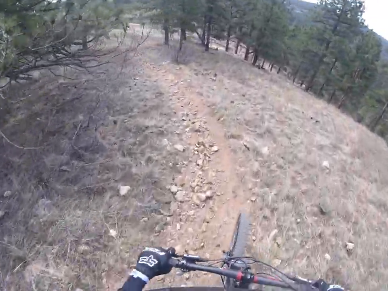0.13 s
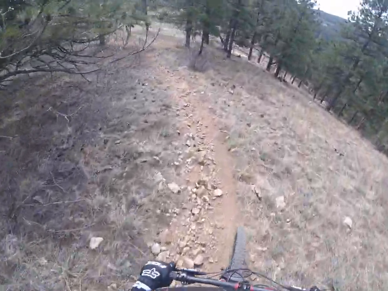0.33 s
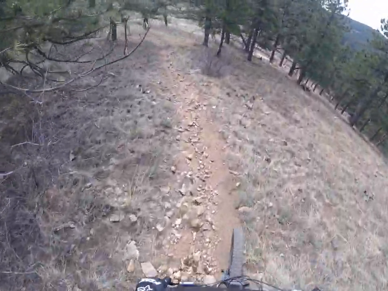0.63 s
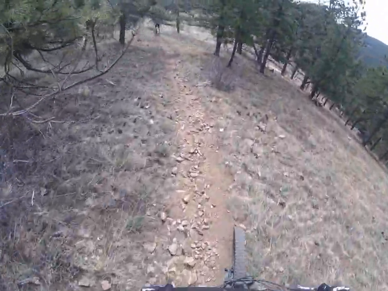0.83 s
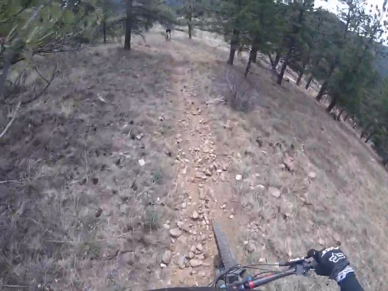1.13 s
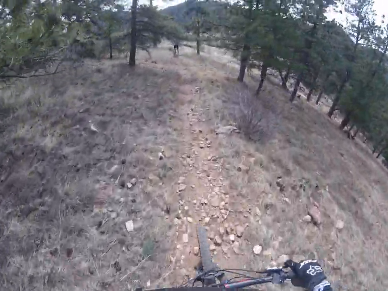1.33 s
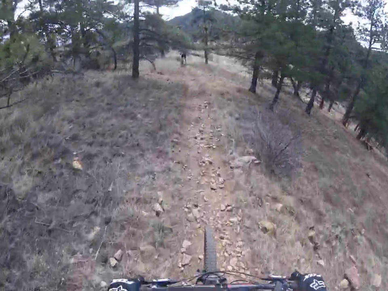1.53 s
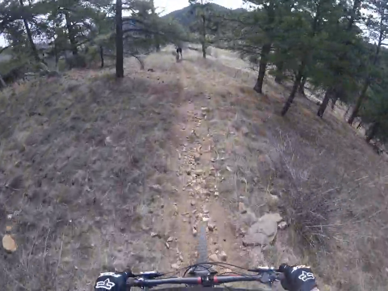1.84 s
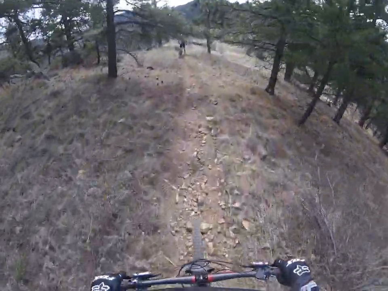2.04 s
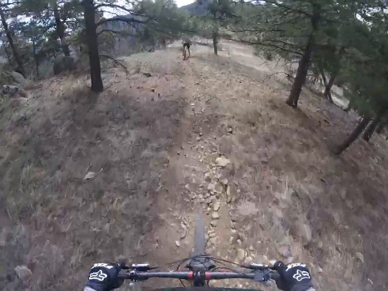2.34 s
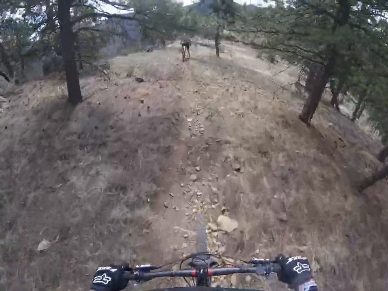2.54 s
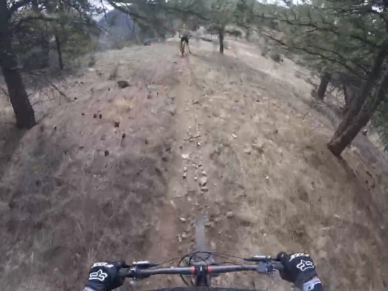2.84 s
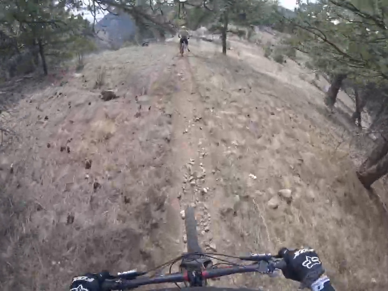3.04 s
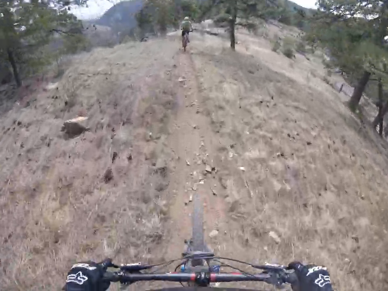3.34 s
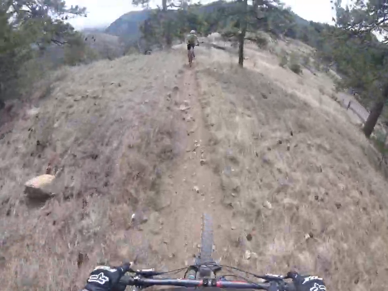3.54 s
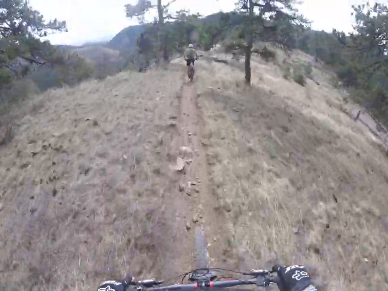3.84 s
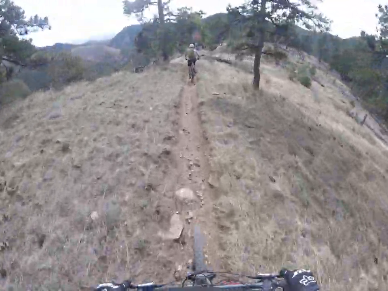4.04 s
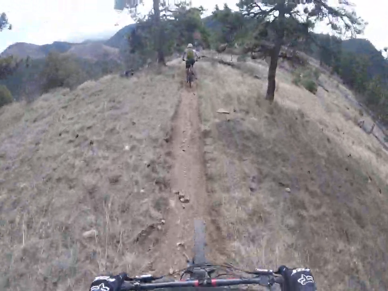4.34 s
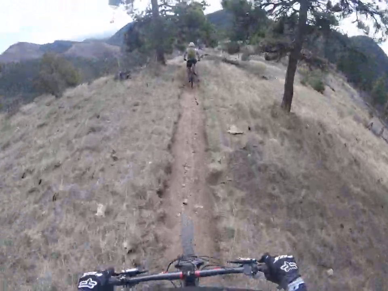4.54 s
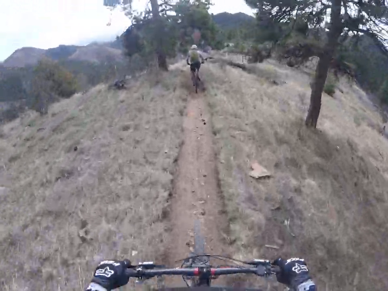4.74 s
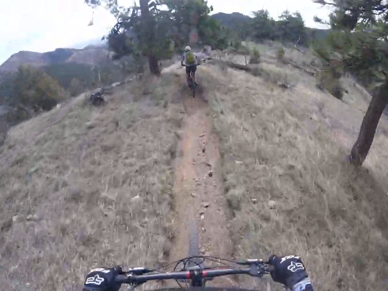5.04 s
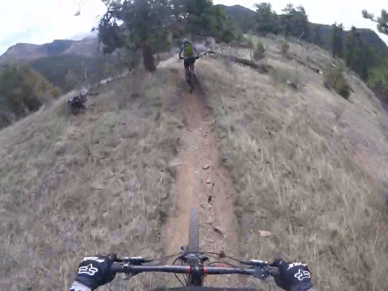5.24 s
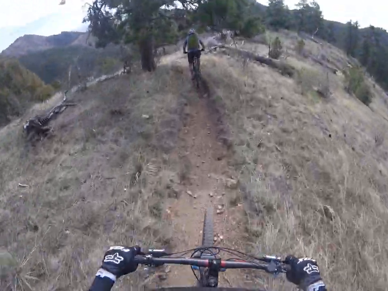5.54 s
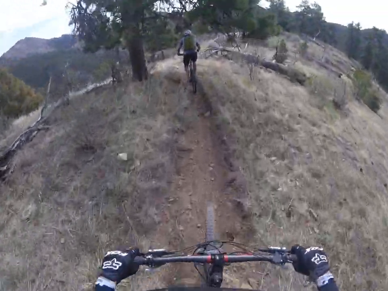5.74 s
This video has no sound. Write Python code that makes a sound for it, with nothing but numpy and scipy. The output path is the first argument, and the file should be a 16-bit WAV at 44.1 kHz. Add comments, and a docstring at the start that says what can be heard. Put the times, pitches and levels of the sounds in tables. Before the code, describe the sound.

A mountain bike travels down a stony dirt trail, heard close up through a small housed camera on the rider's head, in mono and without echo. It opens with a bright rattle and a burst of grit, then quieter crunching and a few knocks until about 1 s, with only a soft bump of wind. From 1 to 3 s stones click and knock in quick, irregular clusters, densest around 2 to 2.8 s, with dull wheel thuds and sharp chain or cable ticks, while low wind flutter swells. From 3 to 4 s the knocks thin slightly under gusty rumble. Another dense clatter comes at 4 to 4.5 s. Very heavy wind thumps strike near 4.4 and 5.0 s, followed by more slaps from 5.1 to 5.6 s. Tyre crunch and deep buffeting grow fuller to an abrupt end at about 5.9 s, over faint steady hiss.

```python
"""Buffeting wind thumps and flutters while a mountain bike crunches and clatters down a stony trail.
A small camera in a housing on the rider's head hears it: turbulence drives low resonances at its port.
Knobbly tyres crack grit as dense random grains; rocks, stones, chain and cables sound as single blows.
The housing cavity rings in the treble, over a soft hiss of passing air and the microphone's own noise."""
import sys
import numpy as np
from scipy import signal
from scipy.io import wavfile
from scipy.ndimage import uniform_filter1d

SR = 44100
rng = np.random.default_rng(int(sys.argv[2]) if len(sys.argv) > 2 else 0)


def int16_out(signal):
    """Quantize to a 16-bit WAV file."""
    q = np.round(np.clip(np.atleast_2d(signal).T, -1, 1) * 32767)
    wavfile.write(sys.argv[1], SR, q.astype(np.int16))


N = 260190  # length [samples]


def undb(db):
    """Decibels to gain."""
    return 10 ** (np.asarray(db) / 20)


def unit(x):
    """Scale to rms 1."""
    return x / np.sqrt(np.mean(x ** 2))


def curves(table):
    """Columns of a table joined by straight lines in time."""
    times, *columns = np.transpose(table)
    return [np.interp(np.arange(N) / SR, times, column) for column in columns]


def band(x, hz, width):
    """Resonance applied twice, so that its skirts are steep."""
    q = max(hz / (1.46 * width), .2)  # each pass is wider, so that the pair has the width asked for
    b, a = signal.iirpeak(min(hz, .45 * SR), q, SR)
    once = signal.lfilter(b, a, x)
    return signal.lfilter(b, a, once)


def walk(rate):
    """Random levels held 1 / rate s and slewed twice, scaled to rms 1."""
    hold = int(SR / rate)
    steps = np.repeat(rng.standard_normal(N // hold + 1), hold)
    slewed = uniform_filter1d(uniform_filter1d(steps, hold), hold)
    return unit(slewed[:N])


def grains(rate, spread_db):
    """Random clicks at an average rate per second; a larger spread makes their strengths less equal."""
    hit = rng.random(N) < rate / SR
    strength = undb(spread_db * np.minimum(rng.exponential(size=N), 3))
    return hit * rng.standard_normal(N) * strength


def resonate(modes, shared, own, flicker_db, rate):
    """Every mode is driven by the common excitation plus noise of its own and flickers alone."""
    total = np.zeros(N)
    for hz, width, db in modes:
        level = undb(db + flicker_db * walk(rate))
        drive = shared + own * rng.standard_normal(N)
        total += level * unit(band(drive, hz, width))
    return unit(total)


# wind strength: (time [s], deep buffeting level [dB], middle swirl level [dB], bright flutter level [dB])
WIND = [(0.0, -33, -36.5, -41), (0.36, -40.5, -72, -54.5), (0.49, -38.5, -50, -61),
        (0.67, -42.5, -52, -53.5), (0.77, -42.5, -57, -65), (0.83, -35, -49, -45.5),
        (0.95, -35.5, -45, -51.5), (1.08, -32, -39, -44), (1.22, -37.5, -50, -56.5),
        (1.35, -39, -38.5, -41.5), (1.41, -35, -59, -44), (1.51, -34.5, -32.5, -44), (1.54, -42, -46, -69),
        (1.58, -37, -50, -37), (1.64, -29, -26, -46), (1.68, -35, -36, -43.5), (1.89, -26.5, -34.5, -41),
        (1.94, -28.5, -50, -69), (1.99, -27.5, -38, -41), (2.09, -33, -44, -44), (2.2, -38, -36.5, -44),
        (2.27, -25, -40, -34.5), (2.35, -25.5, -31, -44), (2.41, -26.5, -40.5, -39.5),
        (2.46, -30, -29.5, -55), (2.58, -26, -40, -34.5), (2.63, -32.5, -35.5, -39.5),
        (2.74, -26.5, -31, -47.5), (2.92, -36.5, -38, -39), (3.22, -33, -25.5, -42.5),
        (3.25, -22, -37, -38.5), (3.32, -36.5, -35, -40.5), (3.66, -29.5, -38, -42),
        (4.16, -28.5, -31, -36.5), (4.26, -30.5, -35.5, -36), (4.44, -27.5, -27.5, -50),
        (4.49, -25.5, -40, -39.5), (4.62, -34, -29, -42), (4.96, -26, -34.5, -40.5), (4.98, -34, -35, -41),
        (5.03, -21.5, -27.5, -44), (5.09, -28, -29, -35.5), (5.62, -31, -29.5, -42.5),
        (5.67, -22, -33.5, -39), (5.8, -31.5, -24, -46), (5.88, -26, -26.5, -48), (5.9, -28, -27, -42)]
# single eddies that slap the port: (time [s], peak level [dB], width scale [ms])
EDDIES = [(0.029, -23.5, 11), (0.467, -28, 10), (1.066, -25, 4.7), (1.641, -17, 11), (2.473, -17, 4.4),
          (2.718, -21.5, 5.6), (2.807, -22.5, 6.9), (2.962, -19, 6.8), (3.059, -19.5, 4.3),
          (3.196, -18, 5.3), (3.225, -22, 1.1), (3.251, -16.5, 4.8), (3.482, -23, 3.2), (3.886, -23.5, 2.3),
          (4.023, -20, 3.7), (4.155, -23, 3.2), (4.432, -10.5, 2.6), (5.035, -9.5, 3.7),
          (5.316, -19.5, 3.1), (5.349, -13.5, 2), (5.508, -15, 2.4), (5.627, -25, 3.9), (5.783, -23, 3.3)]
# single eddies that pull at the port: (time [s], peak level [dB], width scale [ms])
PULLS = [(0.479, -40, 3.9), (0.842, -27.5, 9.2), (1.078, -25.5, 4.9), (1.629, -19, 4.7),
         (1.756, -17.5, 3.1), (1.832, -28, 1.9), (1.882, -15, 3.6), (1.961, -20, 5.2), (1.999, -18, 5.6),
         (2.25, -21, 3.7), (2.317, -17.5, 5.4), (2.345, -17.5, 5.1), (2.573, -18, 14), (3.128, -19, 3.7),
         (3.368, -20, 5.5), (3.784, -15.5, 3.3), (4.136, -17.5, 5), (4.603, -22, 5.8), (4.735, -19, 3),
         (5.005, -20, 7.3), (5.154, -13.5, 3.9), (5.216, -16, 3.7), (5.305, -14.5, 3.6), (5.493, -16, 3.6),
         (5.534, -18, 3.3), (5.868, -13, 3.4)]
# wind resonances at the port, deep, middle and bright: (centre [Hz], width [Hz], relative level [dB])
BUFFET = [(24.2, 13.6, 5), (35.3, 14, 3), (56.1, 21.2, 3)]
SURGE = [(74.4, 43.5, 3.5), (114.5, 29, -3.5), (143.6, 42, -7)]
FLUTTER = [(190.5, 75, 3.5), (221, 82, 1), (329, 198, 0), (477, 760, -14.5)]


def wind():
    """Turbulence in a deep, a middle and a bright part, plus lone pressure slaps and pulls."""
    deep_db, middle_db, bright_db = curves(WIND)
    swirl = unit(grains(150, spread_db=2.5))
    throb = unit(undb(0.76 * walk(25.11)))
    gusts = unit(undb(0.2 * walk(7.11)))
    deep = resonate(BUFFET, swirl, own=0.81, flicker_db=1.0, rate=4.72)
    middle = resonate(SURGE, swirl, own=1.0, flicker_db=0.46, rate=20)
    bright = resonate(FLUTTER, swirl, own=1.33, flicker_db=0.56, rate=7.5)
    out = gusts * undb(deep_db) * deep
    out += throb * gusts ** 0.76 * (undb(middle_db) * middle + undb(bright_db) * bright)
    t = np.arange(N) / SR
    for sign, eddies in [(1, EDDIES), (-1, PULLS)]:
        for s, db, ms in eddies:
            near = slice(max(int((s - .05) * SR), 0), int((s + .05) * SR))
            u = (t[near] - s) * 1000 / ms
            # a pressure bump less a slightly wider, shallower one
            push = np.exp(-(u / 0.74) ** 2) - 0.28 * np.exp(-(u / 0.8) ** 2)
            swept = out[near] * (1 - 0.9 * np.exp(-u ** 2))  # it sweeps the other swirls away
            out[near] = swept + sign * undb(db) * push / push.max()
    return out


# tyre crunch: (time [s], level [dB], upper part against the lower [dB], before a fixed 4.5 dB cut)
ROLL = [(0.0, -38, 0), (0.08, -46, 2.5), (0.23, -48.5, 1.5), (0.61, -53.5, 3), (0.87, -52.5, 1.5),
        (1.02, -49, 2.5), (1.59, -48.5, -0.5), (2.05, -49.5, 2.5), (2.2, -50, -0.5), (2.61, -47, 0.5),
        (2.73, -46, 0.5), (3.75, -46.5, -1), (4.19, -46.5, 0), (4.62, -46, -2.5), (5.04, -43.5, -2.5),
        (5.42, -46.5, 0), (5.67, -43.5, -1), (5.9, -41.5, 0.5)]
# fine grit under the knobs: (time [s], level [dB])
GRIT = [(0.0, -37), (0.03, -47.5), (0.1, -44), (0.45, -55), (1.0, -53.5), (1.5, -52.5), (2.19, -49),
        (2.75, -48), (3.45, -48), (3.73, -53.5), (4.1, -48), (4.57, -51), (5.06, -48), (5.45, -50.5),
        (5.6, -47), (5.9, -46.5)]
# patches of loose stones: (time [s], crunch swell [dB], grit swell [dB], length [ms])
LOOSE = [(0.192, 5.5, 0.5, 88), (0.431, 4.5, 4.5, 36), (0.554, 7, 3.5, 20), (0.806, 10, 5, 29),
         (0.85, 4, 0.5, 38), (1.087, 0.5, 4, 150), (1.325, 4, 8, 12), (1.354, 6, 10, 32), (1.382, 6, 0, 13),
         (1.431, 7.5, -2, 19), (1.596, 6.5, 9, 39), (1.686, 6.5, 0, 57), (1.871, 10, 2, 25),
         (1.971, 2, 15, 12), (2.14, 7, 9.5, 27), (2.269, 6, 3, 170), (2.335, 4, 8, 35), (2.409, 9.5, 4, 13),
         (2.482, 12, 10, 7.4), (2.64, 9.5, 6.5, 40), (2.75, 4, 10.5, 32), (2.898, 5, 10, 8.1),
         (3.183, 4.5, 2, 23), (3.222, 5.5, 4, 27), (3.605, -0.5, 8, 39), (3.717, 5, 8, 14),
         (3.787, 4.5, 5.5, 41), (3.84, 8, -13, 5.6), (3.963, 4.5, 5.5, 31), (4.301, 6, 3, 22),
         (4.349, 9.5, 10, 14), (4.529, 6.5, 3, 47), (4.581, 5.5, 3, 76), (4.7, 3.5, 1, 40),
         (4.828, 4.5, 9.5, 20), (4.998, 6, -4, 17), (5.628, 10, 10.5, 9.4), (5.833, 8, 1, 16)]
# tyre crunch colour, three lower bands then two upper: (centre [Hz], width [Hz], relative level [dB])
CRUNCH = [(484, 465, 4), (860, 700, 1.5), (1406, 900, 6), (2580, 1920, 3.5), (2770, 670, -6.5)]
# housing cavity modes: (centre [Hz], width [Hz], relative level [dB])
CAVITY = [(4940, 840, 11), (5470, 550, 6.5), (6420, 290, 6), (6060, 2000, 3.5), (9020, 300, -6),
          (11400, 730, -16)]


def tyres():
    """Grit cracks under the knobs; coarse grains crunch, fine ones ring the cavity, loose patches swell both."""
    patchy_db = 0.4 * walk(16)
    roll_db, upper_db = curves(ROLL)
    coarse_db = roll_db + patchy_db
    fine_db = curves(GRIT)[0] + patchy_db
    t = np.arange(N) / SR
    for s, crunch_db, grit_db, ms in LOOSE:
        swell = np.exp(-((t - s) * 2000 / ms) ** 2)
        coarse_db = coarse_db + crunch_db * swell
        fine_db = fine_db + grit_db * swell
    unrest = unit(undb(0.49 * walk(60)))
    grit = unit(grains(1200, spread_db=2.5))
    lower = resonate(CRUNCH[:3], grit, own=1.0, flicker_db=3.0, rate=45)
    upper = resonate(CRUNCH[3:], grit, own=1.0, flicker_db=3.0, rate=45)
    coarse = lower + undb(upper_db - 4.5) * upper
    # pebbles tick against each other, sparse enough to stand apart
    for hz in (750., 1200., 1900.):
        coarse += undb(-14) * unit(band(grains(90, spread_db=0.0), hz, hz / 2))
    fine_grit = unit(grains(2500, spread_db=-1.0)) + 0.067 * grit
    fine = resonate(CAVITY, fine_grit, own=1.0, flicker_db=2.5, rate=42)
    return unrest * (undb(coarse_db) * coarse + undb(fine_db) * fine)


def add(out, s, piece):
    """Mix a piece in at a time in seconds."""
    i = int(s * SR)
    out[i:i + len(piece)] += piece[:N - i]


def blows(table, body, sharpness, body_db, crack_db):
    """Each blow is a hard crack and a dying noise cluster, coloured by its own centre and the body it shakes."""
    contact_cycles = 0.23  # length of the contact, in periods of the blow's centre
    out, t = np.zeros(N), np.arange(int(.1 * SR)) / SR
    for s, db, hz, ms in table:
        t60 = max(ms, 5)  # [ms]
        noise, lumps = rng.standard_normal((2, len(t)))
        burst = noise * undb(18.4 * uniform_filter1d(lumps, size=40))
        burst *= undb(-60 * t * 1000 / t60) * np.minimum(t / 0.0011, 1)
        burst[0] = undb(crack_db) * 30 / t60  # the shorter the blow, the stronger its crack
        burst = uniform_filter1d(burst, max(int(contact_cycles * SR / hz), 1))  # low blows touch longer
        ring = unit(sum(undb(g) * band(burst, f, w) / np.sqrt(w) for f, w, g in body))
        piece = unit(band(burst, hz, hz / sharpness)) + undb(body_db) * ring
        add(out, s, undb(db) * piece / np.abs(piece).max())
    return out


def strays(count, db, low_hz, high_hz):
    """Small blows at random times, strengths and centres; harder where the tyres crunch louder."""
    when, size, pitch = rng.random((count, 3)).T
    times = when * N / SR
    roll_s, roll_db, _ = np.transpose(ROLL)
    rough_db = np.interp(times, roll_s, roll_db) - roll_db.mean()
    centres = low_hz * (high_hz / low_hz) ** pitch
    return list(zip(times, db - 8 * size + rough_db, centres))


def lasting(table, t60_ms, ms_per_db):
    """Give each blow its decay: t60_ms at -30 dB, longer for louder ones."""
    return [(s, db, hz, t60_ms + ms_per_db * (db + 30)) for s, db, hz in table]


# stones knocked by the tyres, short ticks to longer crunches:
# (time [s], peak level [dB], centre [Hz], 60 dB decay [ms])
KNOCKS = [(0.126, -31.5, 736, 38), (0.271, -26, 850, 15), (0.632, -27.5, 1740, 21), (0.635, -25, 1710, 29),
          (0.736, -34, 2500, 10), (0.773, -36, 2300, 12), (0.804, -30, 1490, 44), (1.031, -27.5, 1340, 46),
          (1.34, -33, 1100, 15), (1.348, -29, 1200, 21), (1.355, -33, 2500, 15), (1.38, -33, 1200, 25),
          (1.4128, -28, 1430, 29), (1.428, -28, 1680, 19), (1.4305, -25, 1680, 26), (1.498, -40, 900, 20),
          (1.51, -31, 790, 55), (1.526, -26, 2950, 53), (1.565, -34, 920, 76), (1.612, -34, 1050, 14),
          (1.675, -39, 1500, 36), (1.685, -30, 700, 28), (1.79, -38, 1500, 64), (1.803, -29, 1770, 17),
          (1.855, -38, 1200, 37), (1.873, -42, 1500, 27), (1.949, -31, 1220, 40), (2.002, -31, 1140, 37),
          (2.019, -31, 1180, 17), (2.026, -27, 1050, 22), (2.049, -28, 1500, 13), (2.057, -29, 1030, 15),
          (2.131, -26, 1340, 17), (2.185, -28, 855, 16), (2.214, -26.5, 2840, 47), (2.228, -24, 870, 18),
          (2.289, -31, 1390, 68), (2.299, -24, 1000, 20), (2.308, -21.5, 1800, 25), (2.32, -27, 2000, 54),
          (2.329, -33, 2400, 25), (2.34, -25.5, 780, 31), (2.403, -31, 1080, 51), (2.41, -34, 2500, 38),
          (2.48, -30, 900, 17), (2.4865, -21, 1020, 20), (2.502, -30, 1280, 24), (2.503, -25, 3600, 16),
          (2.565, -31, 890, 49), (2.618, -40, 1400, 30), (2.634, -32.5, 2500, 43), (2.65, -28.5, 1160, 30),
          (2.667, -29, 1400, 22), (2.73, -39, 900, 25), (2.744, -20.5, 1120, 21), (2.762, -29, 1220, 20),
          (2.788, -26, 720, 65), (2.813, -24, 2220, 22), (2.921, -30, 2170, 10), (2.942, -28, 760, 31),
          (2.974, -39, 1530, 12), (3.004, -30, 1440, 25), (3.108, -29.5, 2000, 16),
          (3.181, -24.5, 1270, 33), (3.3, -28, 1110, 48), (3.316, -23.5, 1410, 29), (3.429, -26, 1380, 25),
          (3.467, -31, 1350, 91), (3.538, -30, 1370, 86), (3.714, -30, 1270, 49), (3.839, -30, 1800, 15),
          (3.887, -32, 1290, 15), (4.0147, -26, 2500, 23), (4.0522, -23, 1140, 14),
          (4.0563, -20.5, 1050, 14), (4.06, -33, 1100, 23), (4.072, -23, 710, 19), (4.117, -37, 1500, 20),
          (4.121, -27, 895, 26), (4.124, -24.5, 800, 26), (4.129, -24, 1040, 21), (4.1455, -20, 1070, 13),
          (4.237, -28, 2620, 32), (4.241, -28, 1290, 130), (4.247, -38, 1480, 17), (4.342, -29, 1180, 40),
          (4.351, -33, 650, 25), (4.369, -27, 1330, 30), (4.398, -26, 1330, 15), (4.492, -30, 1200, 18),
          (4.512, -23.5, 1110, 22), (4.526, -23.5, 1870, 13), (4.586, -28, 2580, 15),
          (4.695, -28, 1680, 22), (4.776, -29, 1100, 18), (4.829, -32, 1250, 15), (4.89, -27, 3000, 18),
          (4.925, -29, 1290, 15), (4.985, -36, 840, 25), (4.9946, -18.5, 2300, 25), (4.997, -27, 1200, 25),
          (5.002, -28, 1570, 40), (5.089, -26, 1640, 15), (5.102, -32, 750, 22), (5.132, -26, 1000, 20),
          (5.149, -30, 1510, 20), (5.194, -30, 1220, 56), (5.228, -31.5, 1300, 41), (5.282, -30, 1160, 27),
          (5.311, -33.5, 1700, 60), (5.36, -25.5, 1690, 37), (5.397, -33, 2500, 27), (5.464, -27, 1520, 33),
          (5.493, -30, 1480, 20), (5.544, -41, 1300, 23), (5.56, -25, 1080, 32), (5.623, -26, 1990, 42),
          (5.628, -25, 1920, 37), (5.681, -35, 3000, 12), (5.779, -26, 1500, 27), (5.83, -23.5, 1510, 38),
          (5.866, -27, 1290, 12)]


def stone_knocks():
    """Stones struck by the tyres excite the crunch bands and the two lowest listed cavity modes."""
    small = lasting(strays(count=10, db=-40.0, low_hz=487, high_hz=2550), t60_ms=28, ms_per_db=0.5)
    return blows(KNOCKS + small, CRUNCH + CAVITY[:2], sharpness=1.77, body_db=-5.0, crack_db=18.5)


# wheels thudding over rocks: (time [s], peak level [dB], centre [Hz])
THUDS = [(0.141, -30, 218), (0.095, -35, 261), (1.09, -35, 324), (1.317, -33, 278), (1.332, -27, 235),
         (1.345, -39, 205), (1.576, -28, 230), (1.684, -41, 403), (1.824, -25.5, 219), (1.872, -31.5, 242),
         (1.947, -31, 207), (2.117, -27, 214), (2.308, -35, 300), (2.335, -31, 304), (2.473, -27.5, 234),
         (2.498, -29, 200), (2.648, -34, 298), (2.805, -28.5, 253), (2.942, -27, 232), (3.416, -26, 220),
         (4.014, -28, 357), (4.05, -33, 303), (4.117, -31, 300), (4.167, -31, 304), (4.339, -23, 230),
         (4.995, -23, 377), (5.47, -27.5, 240), (5.586, -38, 204), (5.62, -29, 394), (5.824, -33, 318)]


def rock_thuds():
    """Wheels hit rocks: broad low blows that also shake the tyre crunch bands."""
    hits = THUDS + strays(count=8, db=-34.5, low_hz=185, high_hz=370)
    hits = lasting(hits, t60_ms=49.5, ms_per_db=0.1)
    return blows(hits, CRUNCH, sharpness=1.13, body_db=-6.0, crack_db=17.5)


# chain and cable rattles: (time [s], peak level [dB], centre [Hz])
RATTLES = [(0.009, -20, 5850), (0.0684, -27, 6000), (0.1896, -24.5, 4600), (1.0316, -19.5, 6400),
           (1.1338, -29, 6500), (1.3508, -31, 6400), (1.5254, -24, 5800), (1.5908, -28.5, 5660),
           (1.603, -26.5, 6570), (1.727, -31.5, 5500), (1.7616, -31.5, 6500), (1.822, -34.5, 6600),
           (1.8587, -25.5, 4900), (1.873, -25, 4960), (1.9659, -32, 4970), (2.2079, -30, 5360),
           (2.2657, -27, 4640), (2.3067, -25.5, 4930), (2.4798, -35, 5270), (2.635, -27, 5200),
           (2.7733, -28, 6500), (2.803, -30, 5000), (2.8454, -27, 6000), (2.866, -30, 6300),
           (2.9257, -27, 5850), (3.0096, -19.5, 6610), (3.1458, -29, 6700), (3.3217, -28.5, 6550),
           (3.295, -27.5, 5160), (3.345, -32, 6600), (3.4354, -22, 6000), (3.5024, -27.5, 6500),
           (3.5638, -30, 6600), (4.1455, -33, 5270), (4.1694, -28, 6200), (4.2366, -20.5, 5800),
           (4.242, -27, 5500), (4.3425, -27, 5300), (4.348, -28, 4750), (4.578, -28.5, 6040),
           (4.822, -34, 5500), (4.838, -30, 6660), (4.858, -31, 6000), (4.9945, -24.5, 5170),
           (5.216, -30.5, 5560), (5.667, -28, 5060), (5.7763, -30, 6550), (5.8436, -27.5, 5840)]


def chain_rattles():
    """Chain and cables strike in narrow treble bands and ring the housing cavity."""
    hits = RATTLES + strays(count=25, db=-48.0, low_hz=4800, high_hz=6800)
    hits = lasting(hits, t60_ms=25.5, ms_per_db=0.7)
    return blows(hits, CAVITY, sharpness=22.0, body_db=5.5, crack_db=15.0)


def high_hiss():
    """Smooth high hiss: air past the housing plus the microphone's own noise, rising a little with the wind."""
    wind_db = uniform_filter1d(curves(WIND)[0], size=SR // 2)
    hiss = band(rng.standard_normal(N), 8350, 1100)
    hiss += 0.69 * band(rng.standard_normal(N), 4800, 900)
    hiss += 0.77 * band(rng.standard_normal(N), 13400, 2300)  # microphone self-noise
    level_db = -67.5 + 0.081 * (wind_db - wind_db.mean()) + 0.68 * walk(34)
    return undb(level_db) * unit(hiss)


def scene():
    """Wind, tyres, stones, rattles and hiss at one microphone."""
    bike = tyres() + stone_knocks() + rock_thuds() + chain_rattles()
    return (wind() + bike + high_hiss())[None]


def record(dry):
    """The housing swallows a band under its first mode; the camera rolls the treble off and cuts the top."""
    hollow = dry - 0.4 * band(dry, 4360, 2420)
    soft = signal.sosfilt(signal.butter(3, 9800, fs=SR, output="sos"), hollow)
    steep_cut = signal.ellip(8, .2, 70, 13660, fs=SR, output="sos")
    return signal.sosfilt(steep_cut, soft)


dry = scene()
out = record(dry)
int16_out(out)
```